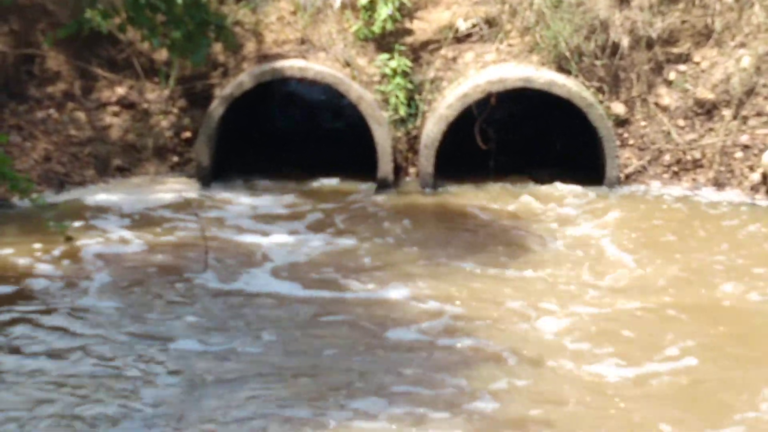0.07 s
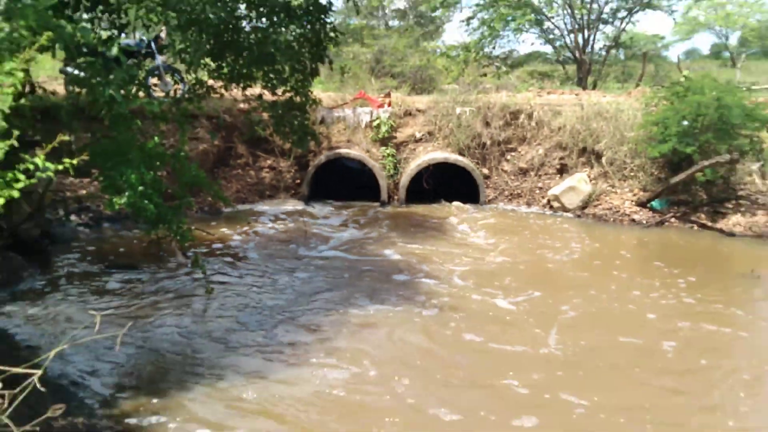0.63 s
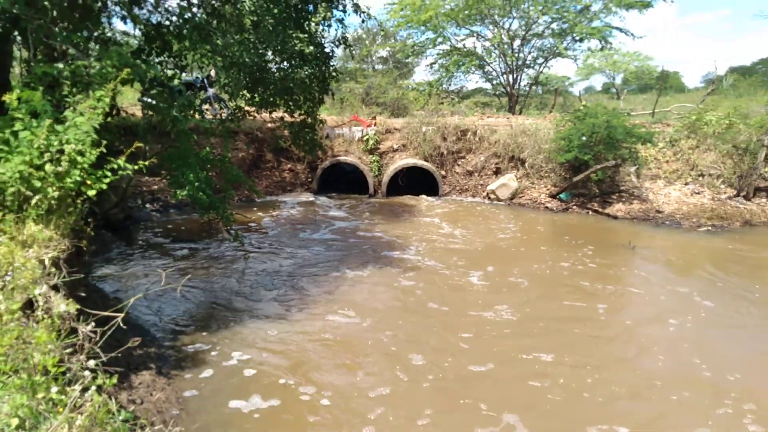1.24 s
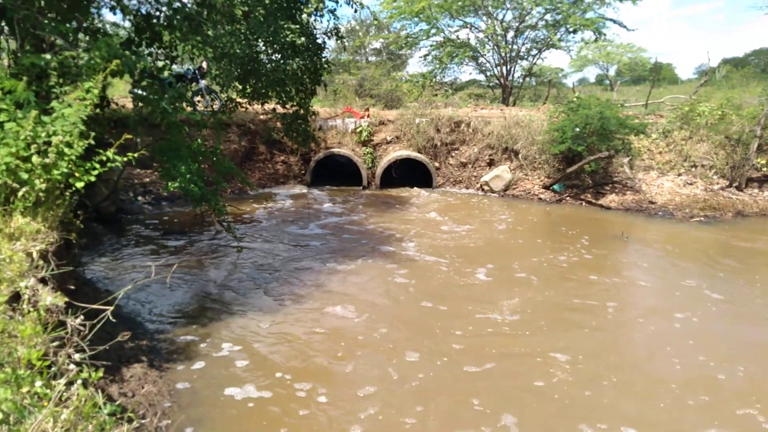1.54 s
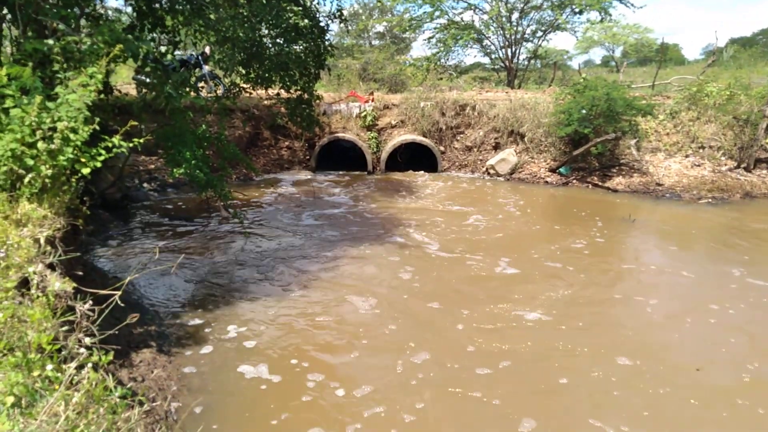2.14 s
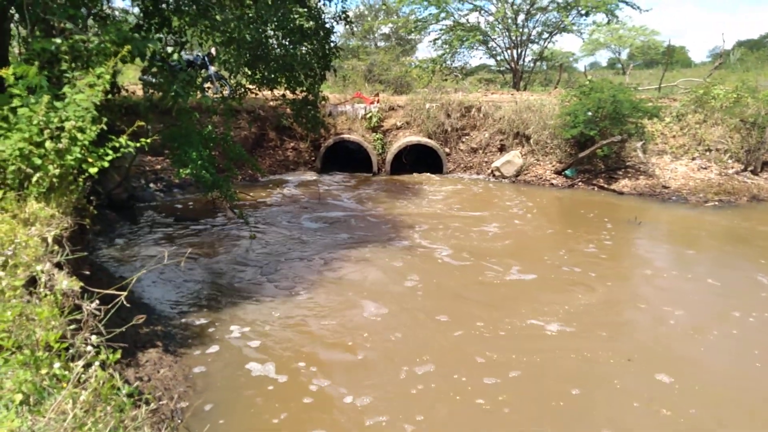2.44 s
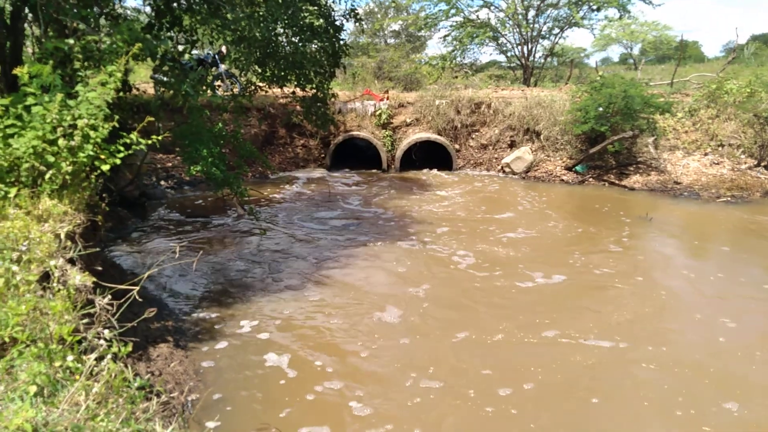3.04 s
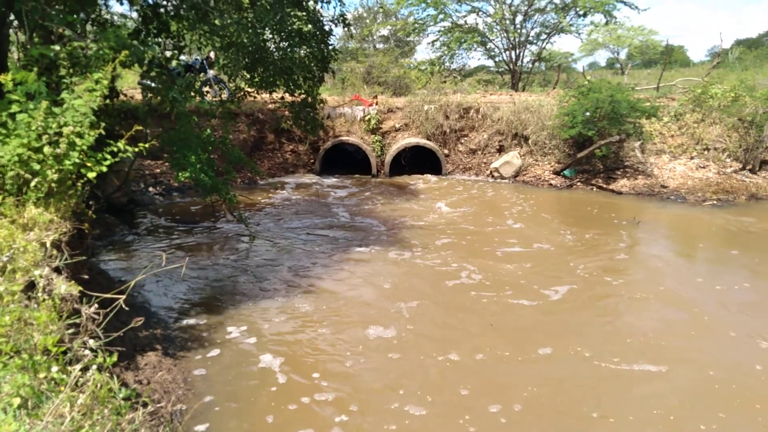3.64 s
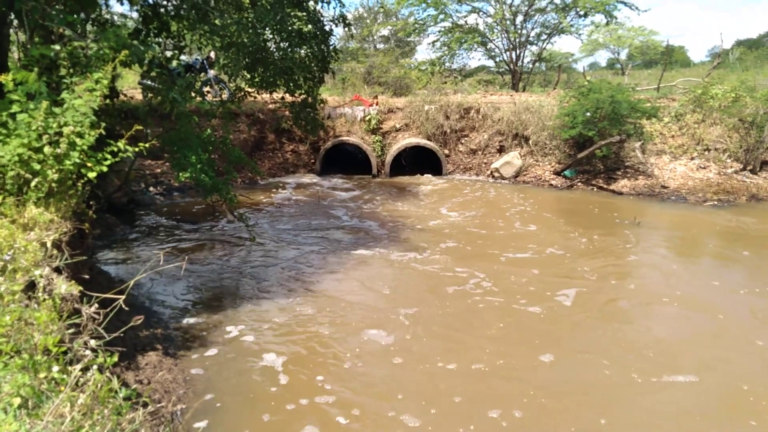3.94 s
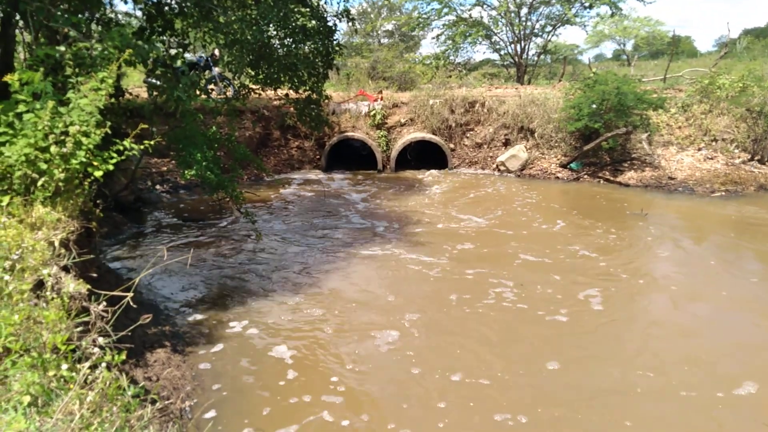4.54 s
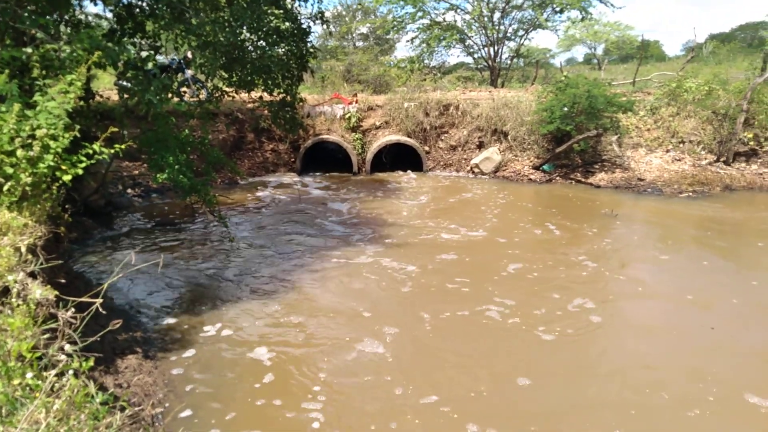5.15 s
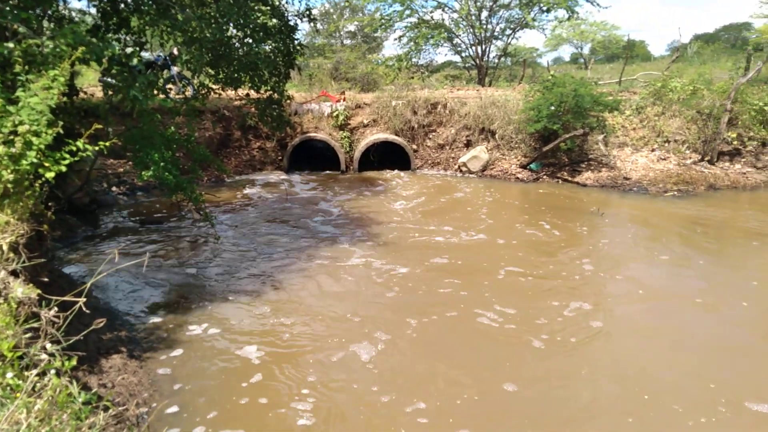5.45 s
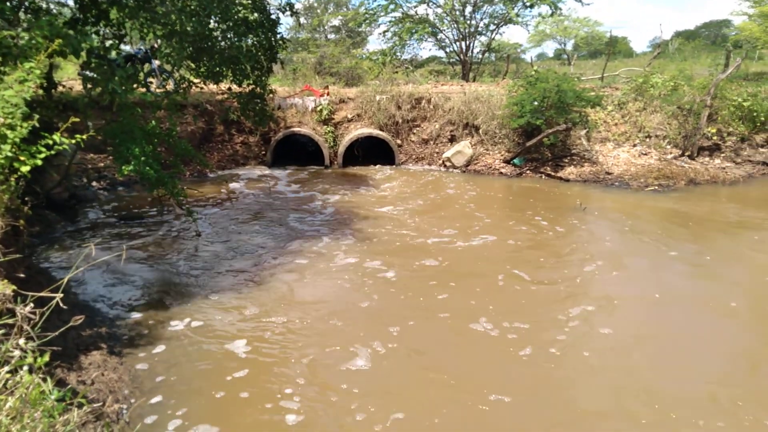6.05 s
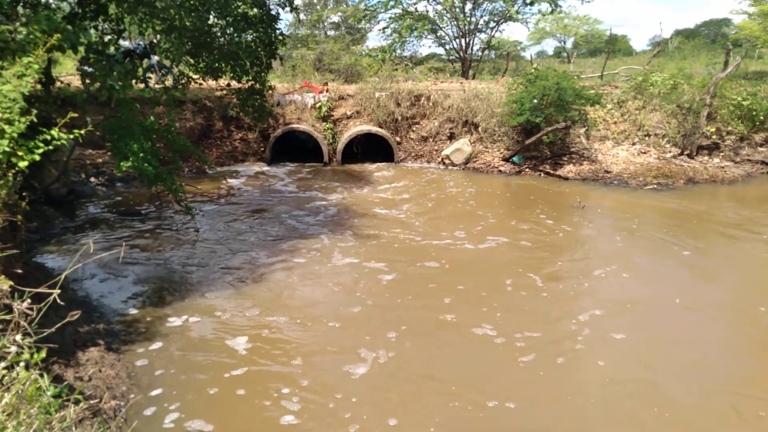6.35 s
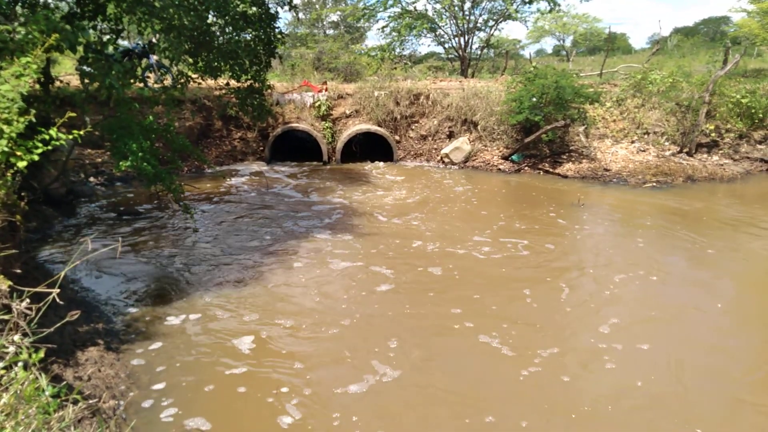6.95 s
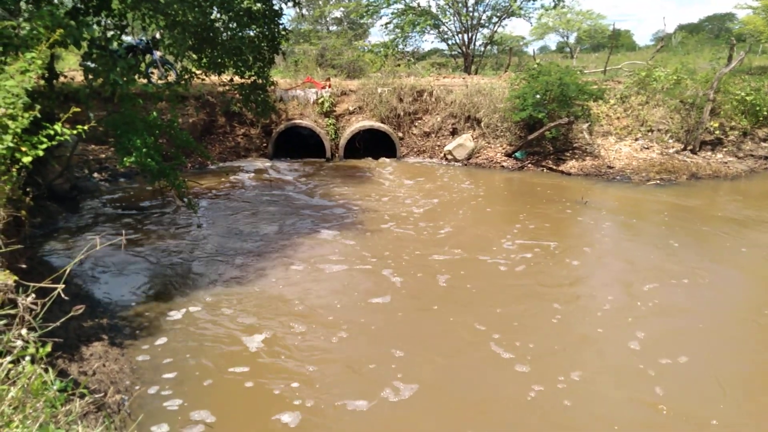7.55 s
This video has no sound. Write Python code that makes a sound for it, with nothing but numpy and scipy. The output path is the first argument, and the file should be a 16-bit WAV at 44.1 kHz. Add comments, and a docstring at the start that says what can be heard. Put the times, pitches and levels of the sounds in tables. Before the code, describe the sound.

A brief, crackling scrape rubs across a hand-held microphone in the open air. Behind it, and then alone, comes the quieter sound of water rushing out of concrete pipes into a pool at a distance: splashing, a low rumble and fine spray, fluttering with short, sudden surges. Soft handling thuds come here and there, and one sharp, bright click stands out before the flow carries on to the end.

```python
"""An outdoor pool, some way off: muddy water rushes into it out of two concrete pipes.
Splashes and ringing bubbles make a low rush, with a thin hiss of foam and spray above it;
its loudness keeps jumping, abruptly and briefly. At the start something sticks and slips over
the hand-held microphone and rings its casing; later come a few soft bumps and a sharp click."""
import sys
import numpy as np
from scipy import signal
from scipy.fft import rfft, irfft, next_fast_len
from scipy.io import wavfile
from scipy.ndimage import uniform_filter1d

SR = 44100
rng = np.random.default_rng(int(sys.argv[2]) if len(sys.argv) > 2 else 0)


def inscribe(sig):
    """Save sig as 16-bit PCM at rate SR to the path in sys.argv[1].

    A 1-D sig is mono; a 2-D sig holds one channel per row.
    Samples are clipped to [-1, 1] before scaling.
    """
    pcm = np.round(np.clip(np.atleast_2d(sig).T, -1, 1) * 32767)
    wavfile.write(sys.argv[1], SR, pcm.astype(np.int16))


N = 343539
TIME = np.arange(N) / SR
# crossfade, 0 to 1, from the early hiss to a thinner one: 0.093 s long, centred on 2.705 s
HISS_TURN = np.clip((TIME - 2.705) / .093 + .5, 0, 1)

# fader shared by rush, rumble and ringing hiss bands, before the level jumps: time_s, gain_db
FLOW_FADER = [(0, -50.5), (.75, -50.5), (1.05, -55), (1.8, -51.5), (2.3, -53.5), (3.6, -53.5), (4.3, -49.5),
              (5.0, -52), (5.9, -50.5), (6.08, -53), (6.6, -48.5), (7.0, -53.5), (7.2, -50), (7.79, -50.5)]
# hard ticks on the casing, ending with the sharp click: start_s, peak_db, tilt_db_per_octave
CASING_TICKS = [(0.0744, -8, -9), (0.0762, -8.5, 2), (0.08, -12, 0.5), (0.087, -7, -4), (.1127, -5, 3),
                (0.1623, -4, 1.5), (0.303, -8, 3), (0.3104, -13, 3), (0.3341, -5, 8), (3.9466, -18, 30),
                (4.7466, 0, 28)]


def water():
    """A low body and a fizzing top; the level of both leaps together, abruptly and briefly."""
    lift_db = level_jumps(edge_s=.002)
    body = rush()
    fizz = rng.standard_normal(N) + undb(-7) * droplets(per_s=2500, spread_db=2.5)
    treble = sizzle(fizz) + spray(fizz)
    body += rumble()
    treble += ringing_hiss_bands(waver_db=4.2) + puffs() + whistles(width_hz=520)
    return body * undb(lift_db) + treble * undb(.87 * lift_db + .49)


def level_jumps(edge_s):
    """Lift in dB: abrupt leaps, with small random blips and a restless flutter between them."""
    # the big leaps in loudness: start_s, length_s, lift_db
    leaps = [(0.0, .045, 8.5), (.454, .074, 8.2), (.556, .01, 12), (.642, .017, 11.5), (.695, .005, 11),
             (.706, .036, 13), (.796, .007, 11.5), (.918, .014, 14), (.947, .011, 10.9), (1.0, .019, 11),
             (1.038, .007, 12.8), (1.134, .007, 13.9), (1.509, .007, 12.8), (1.824, .005, 11),
             (1.87, .007, 11), (1.942, .015, 12.1), (2.673, .079, 11.5), (2.784, .063, 11.8),
             (2.867, .034, 12), (2.915, .035, 12), (3.282, .011, 11.2), (3.442, .008, 13.1),
             (3.472, .022, 11.2), (3.687, .022, 12), (3.718, .047, 11.5), (3.895, .006, 10.8),
             (3.926, .06, 11.6), (4.043, .015, 11.2), (4.097, .021, 10.9), (4.139, .015, 10.8),
             (4.16, .076, 12), (4.249, .012, 13), (4.295, .013, 10.6), (4.318, .019, 12),
             (4.465, .023, 10.3), (4.727, .189, 10), (5.119, .047, 12.8), (5.215, .007, 12.2),
             (5.345, .006, 11.5), (5.527, .022, 14), (5.63, .006, 12.6), (5.722, .007, 11.1),
             (5.775, .01, 12.6), (5.807, .011, 13.5), (5.829, .022, 11.2), (5.864, .018, 11.5),
             (5.919, .015, 12.5), (6.029, .009, 15.5), (6.568, .008, 10), (6.583, .016, 13),
             (6.606, .018, 11.2), (6.679, .014, 11.7), (6.889, .018, 12), (6.935, .017, 10),
             (7.09, .006, 13.5), (7.164, .006, 11.2), (7.358, .02, 11.8), (7.444, .006, 11.3),
             (7.712, .061, 11.7)]
    lift_db = .25 * walk(160) + 4.37 * np.maximum(walk(160) - .7, 0)
    blips_per_s = 5
    draws = rng.random((int(blips_per_s * N / SR) + 1, 3))
    blips = [((k + when) / blips_per_s, .0061 * (.5 + length), 9 + 1.7 * (2 * size - 1))
             for k, (when, length, size) in enumerate(draws)]
    for start_s, length_s, db in blips + leaps:
        lift_db[int(start_s * SR):int((start_s + length_s) * SR)] = db
    return uniform_filter1d(lift_db, int(edge_s * SR))


def rush():
    """Water churns the pool: splashing noise full of bubbles."""
    # tone of the churn, early and late: frequency_hz, gain_db
    early_eq = [(150, -20.5), (250, -6), (549, -2.5), (725, 4), (930, -4), (1160, 0.5), (1310, -5.5),
                (1470, -23.5), (1620, -2.5), (1800, -1), (1940, -5), (2190, -20), (2370, -28), (2620, -31),
                (2700, -33), (3510, -58), (5940, -120)]
    late_eq = [(150, -6), (250, -13), (330, -15), (444, -1.5), (551, -4), (805, 2.5), (939, -4), (1400, -6),
               (1550, -3.5), (1700, 4), (1940, -9), (2200, -0.5), (2510, -21.5), (2780, -24.5),
               (2900, -32.5), (3770, -21.5), (6380, -120)]
    churn = rng.standard_normal(N)
    churn += undb(-7.5) * bubbles(count=7000, low_hz=246.6, high_hz=2628, cycles=14.7, spread_db=1.5)
    return blend(churn, early_eq, late_eq, at_s=4.0, over_s=.084) * fader(FLOW_FADER, trim_db=-1)


def bubbles(count, low_hz, high_hz, cycles, spread_db):
    """Air pockets of all sizes ring briefly and rise in pitch as they near the surface."""
    out = np.zeros(N)
    for when, pitch, force in rng.random((count, 3)):
        hz = low_hz + pitch * (high_hz - low_hz)
        strength = undb(-spread_db * np.log(.032 + force)) * np.sqrt(hz)
        add(out, when * N / SR, strength * ring(hz, cycles / hz, cycles / hz, glide=.1))
    return unit(out)


def rumble():
    """The pipes' low rumble wavers and slowly recedes."""
    # tone of the pipes, early and late: frequency_hz, gain_db
    early_eq = [(15, -44.5), (25, -17), (80, 0.5), (124, -2), (199, 0.5), (257, -1.5), (330, -9),
                (430, -33), (730, -120)]
    late_eq = [(15, -49), (25, -21), (38, -21), (80, -8), (107, -10), (141, -4), (199, 2), (330, -7),
               (430, -46), (730, -120)]
    noise = blend(rng.standard_normal(N), early_eq, late_eq, at_s=5.26, over_s=.11)
    return noise * fader(FLOW_FADER, trim_db=-9.5) * undb(-.57 * TIME + .97 * walk(14))


def droplets(per_s, spread_db):
    """Dense tiny impacts of uneven size."""
    chance, polarity, force = rng.random((3, N))
    hits = (chance < per_s / SR) * np.sign(polarity - .5)
    return unit(hits * undb(-spread_db * np.log(.0033 + force)))


def sizzle(fizz):
    """Foam sizzles in the mid treble: it fades slowly, drops as the hiss turns and swells three times."""
    # tone of the foam, early and late: frequency_hz, gain_db
    early_eq = [(1470, -45), (2500, -33), (2610, -25.5), (2750, -13.5), (3020, 0), (3290, 2.5), (3540, -13),
                (3860, -3.5), (4580, 3), (5990, -8.5), (6420, -38.5), (9000, -27), (11700, -55.5),
                (19800, -120)]
    late_eq = [(1470, -14), (2500, -10), (2680, -19), (3000, 4), (3320, -10.5), (3540, -7.5), (4320, -3.5),
               (4830, -0.5), (5350, 2), (6090, -5.5), (6770, -21), (7580, -29), (9000, -32), (11700, -46),
               (19800, -120)]
    # brief swells: centre_s, half_length_s, lift_db
    swells = [(1.76, 0.17, 11), (4.3, 0.22, 7), (4.77, 0.065, 17)]
    level_db = (1 - HISS_TURN) * (-52.5 - 6.5 * TIME) - 80.5 * HISS_TURN
    level_db += sum(db * np.exp(-((TIME - s) / half) ** 2) for s, half, db in swells)
    return blend(twinkle(fizz, depth_db=6), early_eq, late_eq, at_s=1.1, over_s=.037) * undb(level_db)


def spray(fizz):
    """Fine spray: the highest hiss, which comes forward as the foam drops away."""
    # tone of the spray, early and late: frequency_hz, gain_db
    early_eq = [(2940, -57), (5000, -37.5), (6030, -17), (6360, 7), (7490, 5.5), (9530, -5.5), (10000, -9),
                (11300, -1.5), (15100, -7.5), (15800, -16.5)]
    late_eq = [(2940, -86), (5000, -47), (5250, -54), (5480, -66.5), (5720, -32), (6270, -8.5), (6480, 1),
               (7070, 11.5), (8370, -4), (8950, -0.5), (10300, 9), (11200, 5), (14600, 4), (15800, -4)]
    # rise and fall of the spray: time_s, gain_db
    ride = [(.5, -85), (.8, -81), (1.1, -85), (2.62, -79.5), (2.8, -61.5), (3.0, -53), (3.2, -62),
            (3.85, -62.5), (4.4, -56), (4.6, -60.5), (5.0, -61), (5.2, -56), (6.1, -62), (6.5, -54),
            (6.95, -64.5), (7.79, -57.5)]
    mist = blend(twinkle(fizz, depth_db=7), early_eq, late_eq, at_s=3.6, over_s=1.0)
    return mist * fader(ride, trim_db=-1.9)


def twinkle(x, depth_db, size=768):
    """Neighbouring pitches swell and fade on their own, less so at the very top."""
    hz, _, cells = signal.stft(x, SR, nperseg=size)
    swell = rng.standard_normal(cells.shape)
    swell = uniform_filter1d(uniform_filter1d(swell, size=3, axis=0), size=11, axis=1)
    depth = depth_db * np.interp(hz, [9000, 12000], [1, .2])
    gain = undb(depth[:, None] * unit(swell))
    gain /= np.sqrt(np.mean(gain ** 2, axis=1, keepdims=True))
    return signal.istft(cells * gain, SR, nperseg=size)[1][:N]


def ringing_hiss_bands(waver_db):
    """Thin, ringing bands of treble hiss waver in level; one set gives way to another at the turn."""
    # hiss bands before and after the turn: pitch_hz, width_hz, relative_db
    early_bands = [(2963, 130, -12), (4470, 230, -11.5), (5310, 220, -3.5), (5850, 240, -7.5)]
    late_bands = [(3035, 120, -28.5), (3620, 160, -34.5), (5240, 160, -28.5), (7250, 170, -17),
                  (8080, 530, -16)]
    early, late = ([airy(hz, width) * undb(db + waver_db * walk(22)) for hz, width, db in bands]
                   for bands in (early_bands, late_bands))
    build = np.minimum(TIME / 1.87, 1) ** 2  # the two highest early bands creep in
    ringing = (1 - HISS_TURN) * (sum(early[:2]) + build * sum(early[2:])) + HISS_TURN * sum(late)
    return ringing * fader(FLOW_FADER, trim_db=-5.5)


def puffs():
    """Narrow bands of hiss swell and vanish."""
    # pitched puffs: centre_s, half_length_s, pitch_hz, width_hz, relative_db
    cues = [(.77, 0.12, 9600, 600, -77), (1.716, 0.081, 13500, 500, -75), (1.727, 0.092, 10300, 400, -77),
            (1.79, 0.21, 2330, 200, -63.5), (2.783, .07, 5300, 180, -63.5), (3.03, 0.27, 8750, 1100, -67),
            (3.982, 0.048, 3220, 300, -65), (4.196, .06, 3150, 400, -64.5), (6.753, 0.082, 8100, 800, -59)]
    return sum(airy(hz, width) * undb(db) * np.clip(2 - 1.7 * np.abs(TIME - s) / half, 0, 1)
               for s, half, hz, width, db in cues)


def whistles(width_hz):
    """Thin, airy whistles glide through the treble."""
    # one path per whistle: time_s, pitch_hz, relative_db
    paths = [
        [(3.68, 7330, -83), (3.688, 6950, -45.5), (3.72, 7150, -60), (3.745, 6800, -49), (3.765, 6600, -54),
         (3.78, 6350, -78)],
        [(3.92, 6990, -80), (3.93, 6980, -45), (3.96, 6900, -63), (4.02, 6750, -57), (4.2, 6820, -60.5),
         (4.5, 6900, -64)],
        [(3.94, 8600, -62), (4.04, 10200, -51), (4.14, 10880, -55), (4.26, 11300, -59), (4.38, 10840, -54),
         (4.5, 10000, -61)],
        [(4.08, 14600, -70), (4.18, 15400, -67), (4.26, 15800, -66), (4.4, 14600, -72)],
    ]
    out = np.zeros(N)
    for path in paths:
        hz, db = curves(path)
        sounding = (TIME > path[0][0]) & (TIME < path[-1][0])
        out += airy(hz, width_hz) * undb(db - .5) * sounding
    return out


def scrape():
    """Something drags over the microphone: hard and fast at first, then it eases, slows and lifts off."""
    # tone of the rubbing hiss: frequency_hz, gain_db
    rub_eq = [(240, -50), (400, -28), (425, -22.5), (474, -14.5), (570, -7), (863, -19), (1600, -10.5),
              (2490, -11.5), (4690, -10), (6470, 2), (7790, -5.5), (9220, -8.5), (10600, -5),
              (12400, -18.5), (15800, -24)]
    start_s, ease_s, slowing_s = .072, .168, .165
    slip_hz = 128.7 * np.exp(-np.clip(TIME - ease_s, 0, 1) / slowing_s)
    eased = np.clip((TIME - ease_s) / .012, 0, 1)
    judder = slips(slip_hz, spread_db=1.5) * undb(-31.5)
    judder *= envelope(start_s, attack_s=.0033, hold_until_s=.255, fall_db_per_s=260)
    crackle_hz = 4.4 * slip_hz * (1 + .06 * walk(400))
    crackle = slips(crackle_hz, spread_db=2) * undb(-29 - 20 * eased)
    crackle *= envelope(start_s, attack_s=.04, hold_until_s=.29, fall_db_per_s=250)
    rub = colour(rng.standard_normal(N), rub_eq)
    rub *= undb(-21 - 44.5 * (TIME - start_s) + .62 * walk(300))
    rub *= envelope(start_s, attack_s=.046, hold_until_s=.39, fall_db_per_s=165)
    contact = envelope(start_s, attack_s=.00198, hold_until_s=.53, fall_db_per_s=1500)
    return (judder + crackle + rub + squeak() + groan()) * contact


def slips(rate_hz, spread_db, cutoff_hz=11000):
    """Stick-slip: one blow on the casing at each release, dulled by the soft contact; rms near 1."""
    release = np.diff(np.floor(np.cumsum(rate_hz) / SR), prepend=0)
    blows = release * np.sqrt(SR / np.maximum(rate_hz, 1)) * undb(spread_db * rng.standard_normal(N))
    body = signal.sosfilt(signal.butter(4, cutoff_hz, fs=SR, output="sos"), casing(-1.3))
    return signal.oaconvolve(blows, body / np.linalg.norm(body))[:N]


def casing(tilt_db_per_octave):
    """The casing's answer to one tiny blow, brighter for a harder contact; peak 1."""
    # modes of the casing: pitch_hz, t60_s, relative_db
    modes = [(1450, 0.00264, -32), (6800, 0.0024, -7), (7440, 0.0032, 9.5), (10700, 0.0016, 8),
             (13000, .0007, -6)]
    pivot_hz = modes[2][0]
    sound = sum(undb(db + tilt_db_per_octave * np.log2(hz / pivot_hz)) * ring(hz, t60, .006)
                for hz, t60, db in modes)
    return sound / np.abs(sound).max()


def squeak():
    """A rough squeak rises through the scrape."""
    # the squeak's climb: time_s, pitch_hz, gain_db
    path = [(.075, 517.6, -57), (.09, 548, -51), (.125, 563, -60), (.14, 621, -43), (.166, 784, -38),
            (.173, 784, -69)]
    # its partials: harmonic_number, relative_db
    partials = [(1, -11.5), (2, 0.5), (3, -7.5), (4, -6)]
    hz, gain_db = curves(path)
    return sum(undb(db) * airy(k * hz, width_hz=130) for k, db in partials) * undb(gain_db)


def groan():
    """A low tone rises and sinks under the scrape."""
    # the groan's arc: time_s, pitch_hz, level_db
    path = [(.11, 85.5, -77), (.14, 101, -36.5), (.158, 122, -32.5), (.174, 126, -26), (.195, 115, -33),
            (.22, 98, -37), (.25, 79.9, -46), (.3, 60, -57), (.35, 55, -90)]
    hz, db = curves(path)
    return np.sqrt(2) * np.sin(2 * np.pi * np.cumsum(hz) / SR) * undb(db)


def handling():
    """Hard ticks ring the casing; soft bumps only thud."""
    # soft, low bumps: start_s, pitch_hz, level_db, t60_s
    bumps = [(1.005, 89, -35, 0.094), (1.134, 83, -38, 0.07), (2.679, 133, -28, 0.061),
             (2.693, 200, -24, 0.012), (2.725, 141, -33.5, 0.045), (2.787, 360, -20, 0.012),
             (2.869, 244, -20, 0.0069), (2.891, 110, -34, 0.056), (2.9192, 233, -23, 0.011),
             (3.947, 413, -24, 0.015), (5.118, 69.6, -36, 0.12), (5.843, 365, -31, 0.033),
             (6.033, 453, -31.5, 0.019)]
    out = np.zeros(N)
    for start_s, db, tilt in CASING_TICKS:
        add(out, start_s, undb(db) * casing(tilt))
    for start_s, hz, db, t60 in bumps:
        add(out, start_s, undb(db) * ring(hz, t60, t60))
    return out


def click_tail():
    """A hiss hangs on after the last click."""
    # dying bands of hiss: pitch_hz, width_hz, level_db, t60_s
    bands = [(3680, 200, -58, 1.4), (7060, 1600, -43.5, 0.43)]
    click_s = CASING_TICKS[-1][0]
    return sum(airy(hz, width) * undb(db) * envelope(click_s, .0041, click_s, 60 / t60)
               for hz, width, db, t60 in bands)


def undb(db):
    """Decibels to gain."""
    return 10 ** (np.asarray(db) / 20)


def unit(x):
    """Scale to rms 1."""
    return x / np.sqrt(np.mean(x ** 2) + 1e-20)


def curves(table):
    """Each column after the time column as a value per sample."""
    times, *columns = np.transpose(table)
    return [np.interp(TIME, times, column) for column in columns]


def fader(table, trim_db):
    """Gain per sample from rows of time_s, gain_db."""
    return undb(curves(table)[0] + trim_db)


def envelope(start_s, attack_s, hold_until_s, fall_db_per_s):
    """Gain that rises evenly, holds, then dies away."""
    rise = np.clip((TIME - start_s) / attack_s, 0, 1)
    return rise * undb(-fall_db_per_s * np.maximum(TIME - hold_until_s, 0))


def colour(x, eq):
    """Filter by an EQ curve that falls 40 dB per octave beyond its ends; rms 1."""
    hz, db = np.transpose(eq)
    size = next_fast_len(N, True)
    octave, knots = np.log2(np.arange(size // 2 + 1) * SR / size + 1), np.log2(hz)
    outside = np.abs(octave - np.clip(octave, knots.min(), knots.max()))
    gain = undb(np.interp(octave, knots, db) - 40 * outside)
    return unit(irfft(rfft(x, size) * gain, size)[:N])


def blend(x, early_eq, late_eq, at_s, over_s):
    """Equal-power crossfade from one EQ curve to another."""
    angle = np.clip((TIME - at_s) / over_s + .5, 0, 1) * np.pi / 2
    return np.cos(angle) * colour(x, early_eq) + np.sin(angle) * colour(x, late_eq)


def walk(rate_hz):
    """Random steps, smoothed twice; rms 1."""
    hold = int(SR / rate_hz)
    steps = np.repeat(rng.standard_normal(N // hold + 1), hold)
    return unit(uniform_filter1d(uniform_filter1d(steps, hold), hold)[:N])


def airy(hz, width_hz):
    """A narrow band of hiss around a pitch that may glide; rms near 1."""
    phase = 2 * np.pi * np.cumsum(hz + np.zeros(N)) / SR
    return walk(2 * width_hz) * np.cos(phase) + walk(2 * width_hz) * np.sin(phase)


def ring(hz, t60_s, length_s, glide=0):
    """A dying sine whose pitch rises by the share glide over t60_s."""
    t = np.arange(int(length_s * SR)) / SR
    return np.sin(2 * np.pi * hz * t * (1 + glide * t / t60_s / 2)) * np.exp(-np.log(1000) * t / t60_s)


def add(out, start_s, sound):
    """Mix a short sound in at its start time."""
    i = int(np.clip(start_s * SR, 0, N - 1))
    out[i:i + len(sound)] += sound[:N - i]


def scene():
    """Open air, one channel: distant water and the noises of the hand."""
    return (water() + scrape() + handling() + click_tail())[None]


def record(dry):
    """A steep low-pass cuts the very top."""
    cutoff_hz = 15850
    return signal.sosfilt(signal.ellip(10, .2, 80, cutoff_hz, fs=SR, output="sos"), dry)


dry = scene()
out = record(dry)
inscribe(out)
```